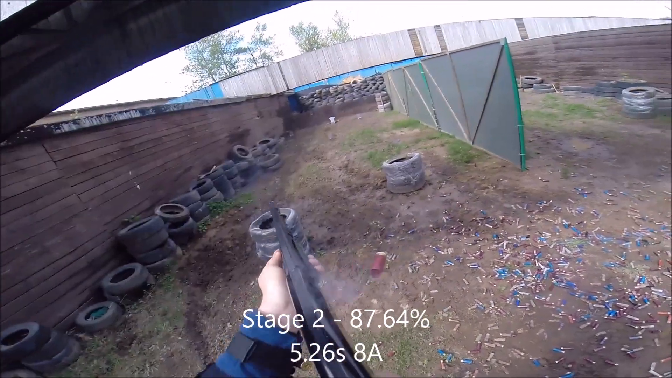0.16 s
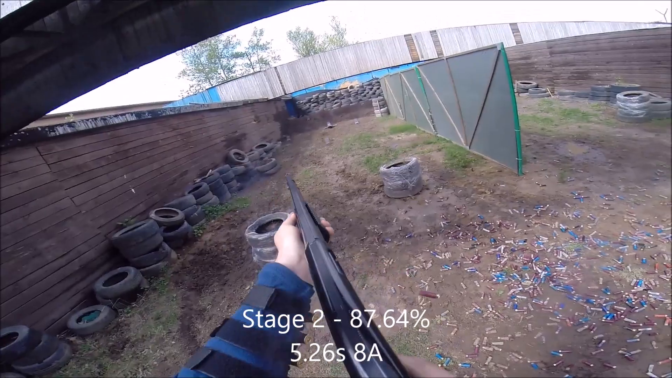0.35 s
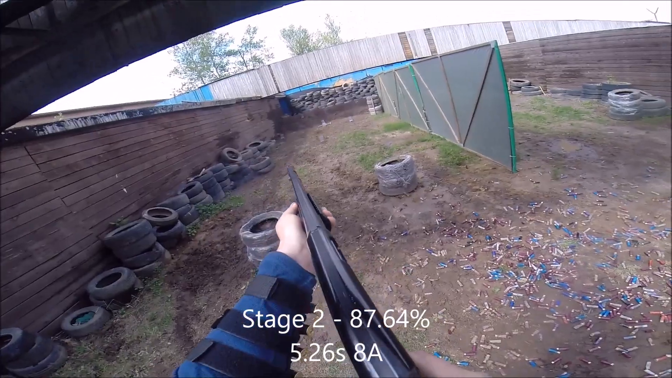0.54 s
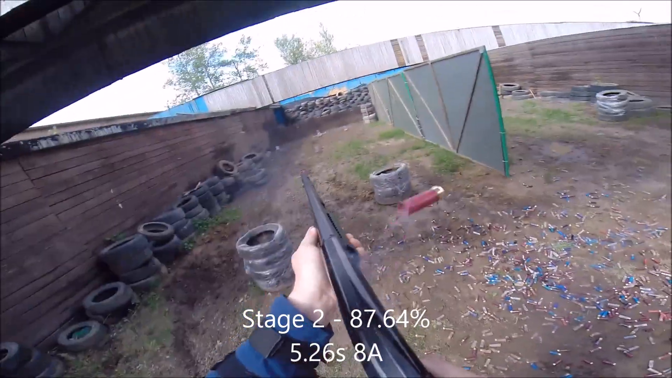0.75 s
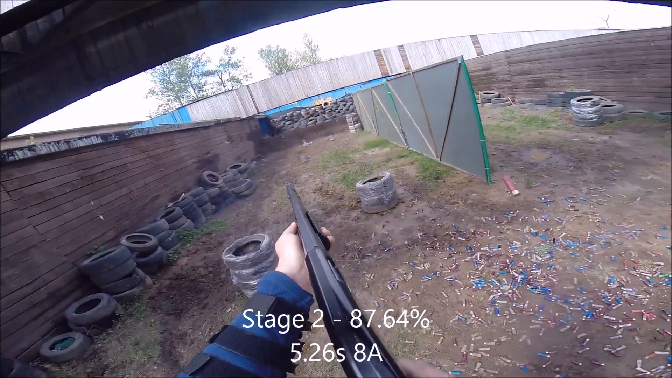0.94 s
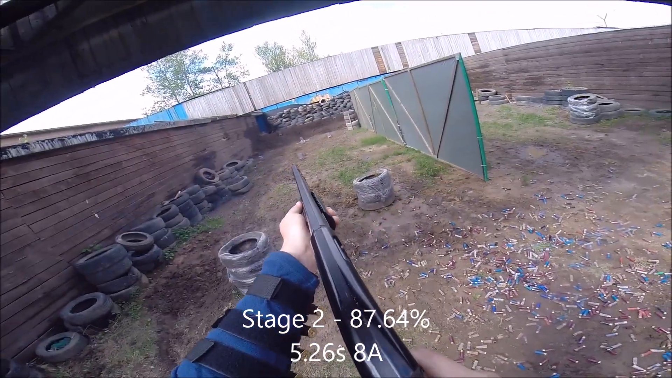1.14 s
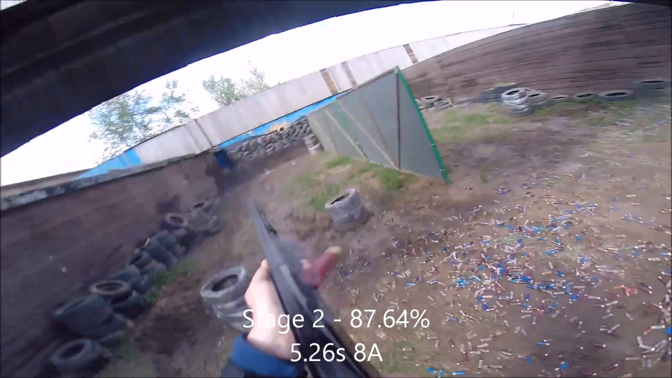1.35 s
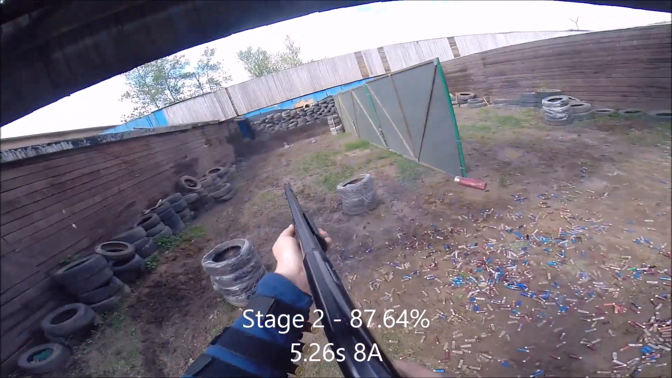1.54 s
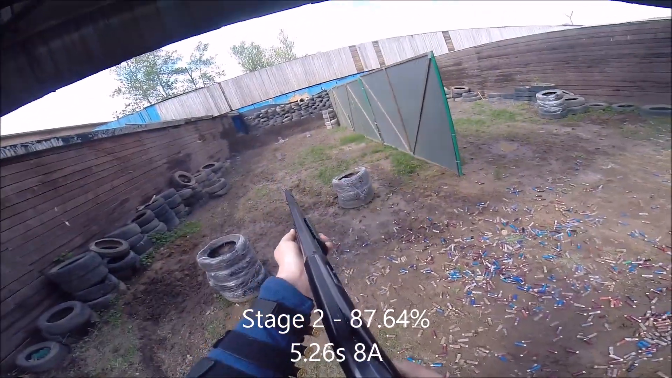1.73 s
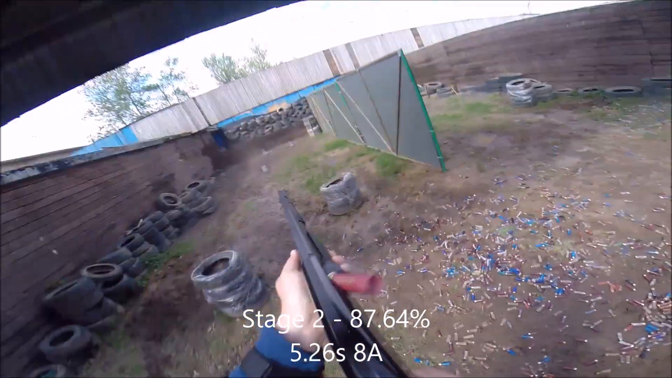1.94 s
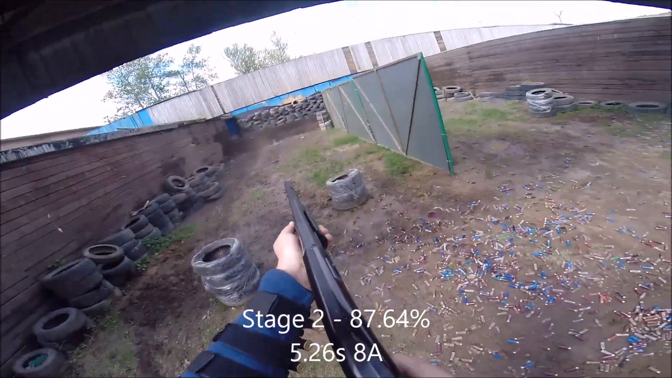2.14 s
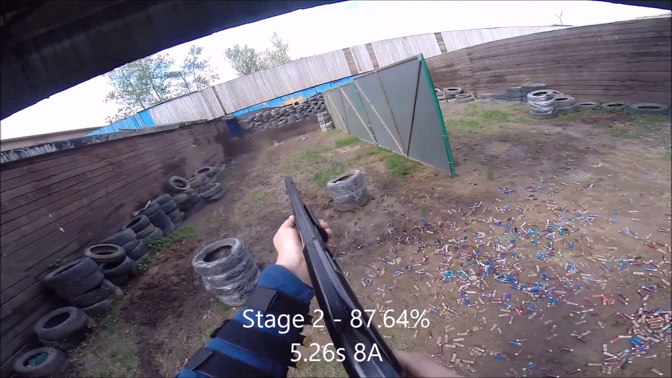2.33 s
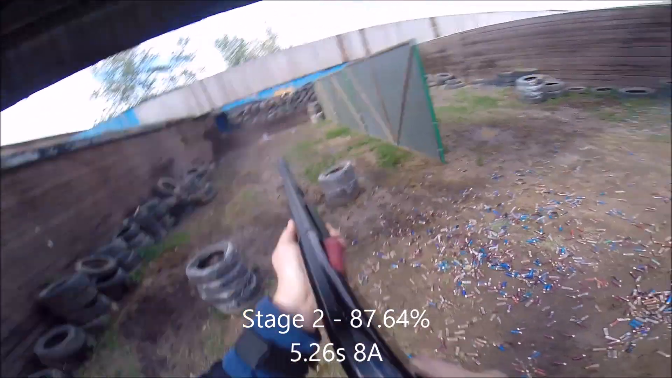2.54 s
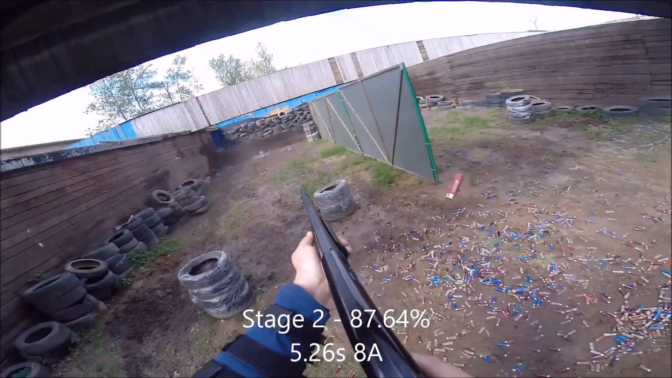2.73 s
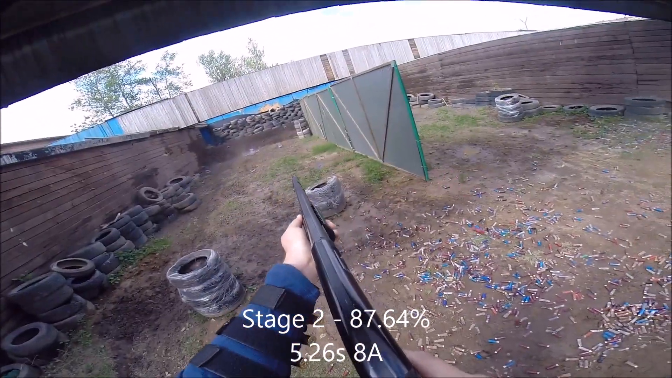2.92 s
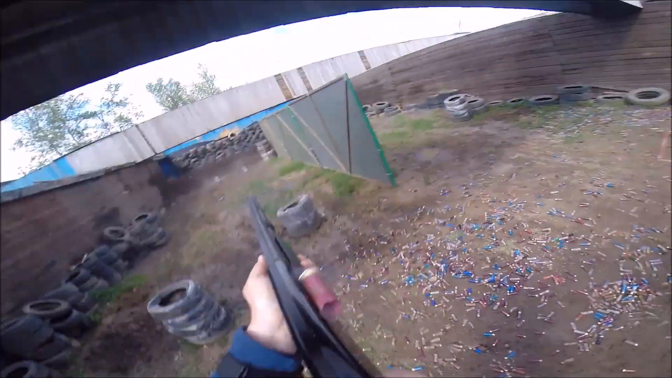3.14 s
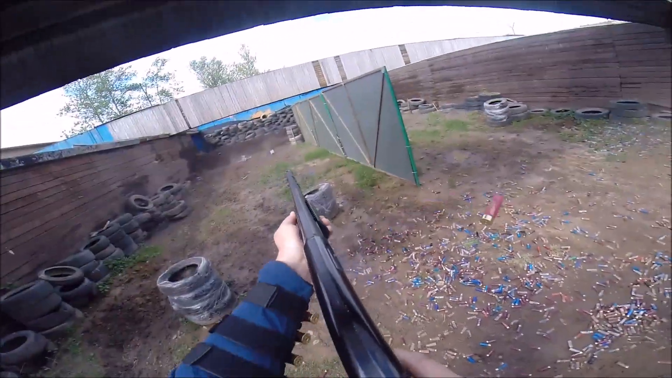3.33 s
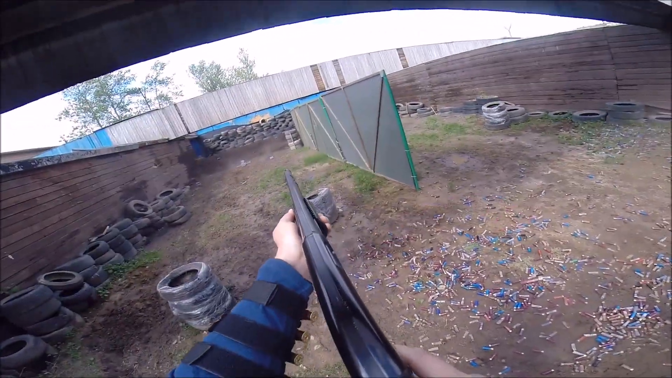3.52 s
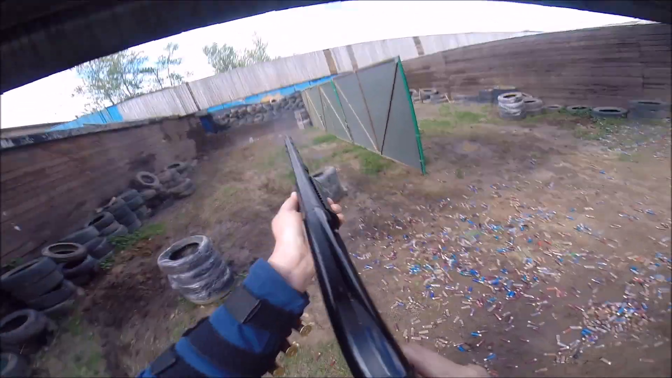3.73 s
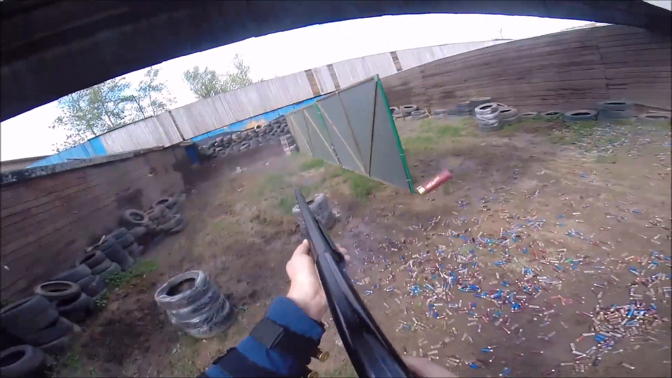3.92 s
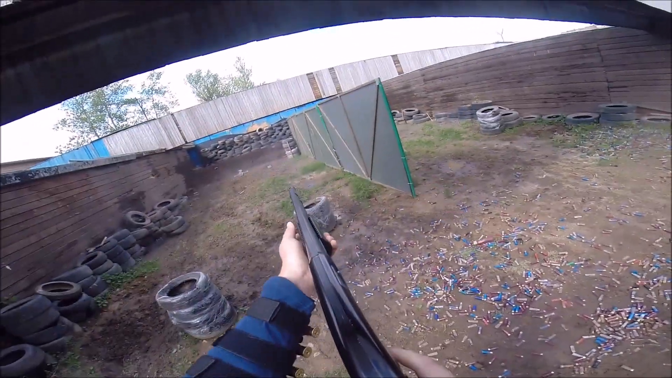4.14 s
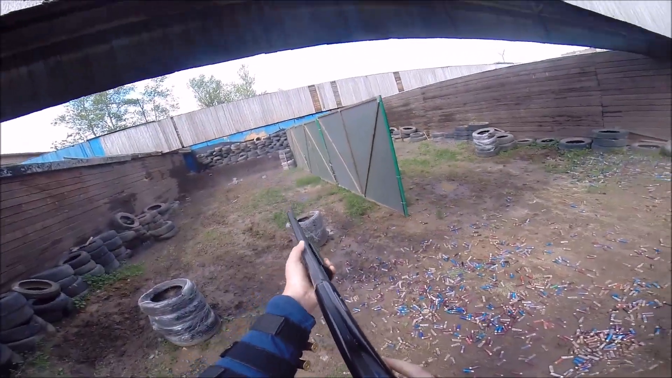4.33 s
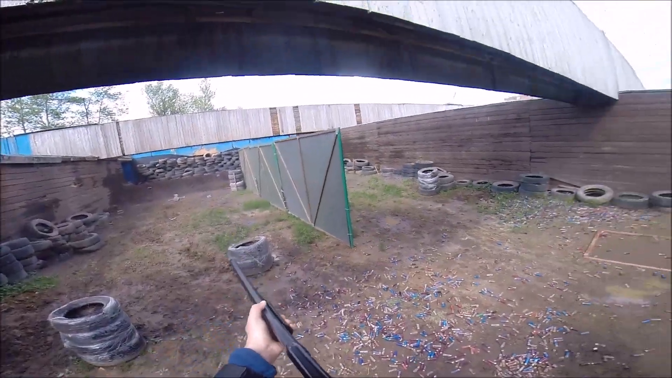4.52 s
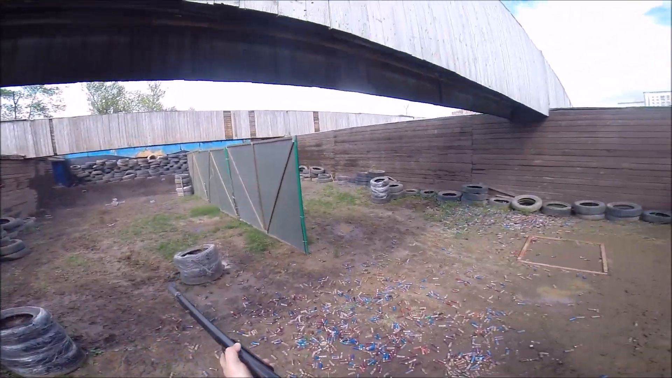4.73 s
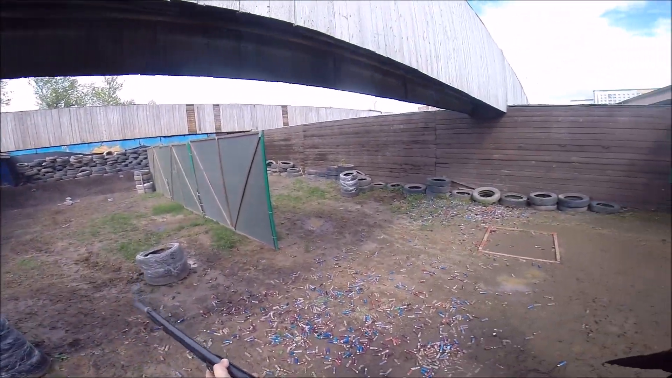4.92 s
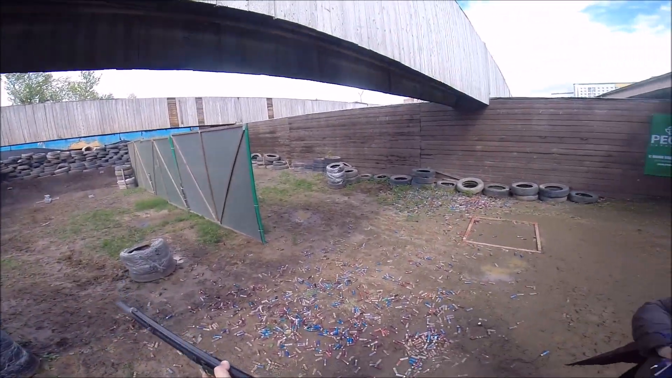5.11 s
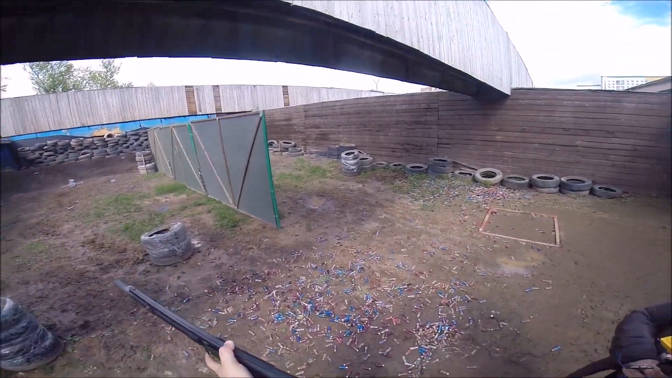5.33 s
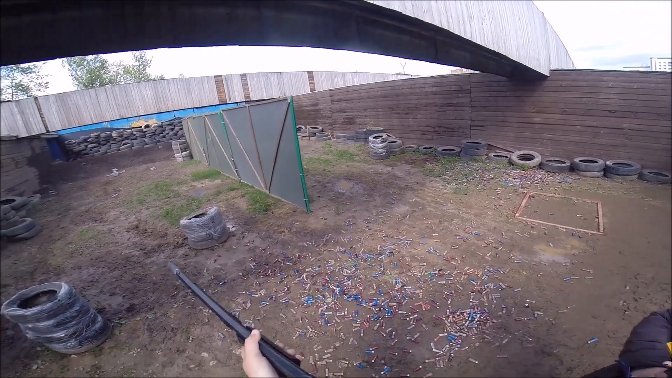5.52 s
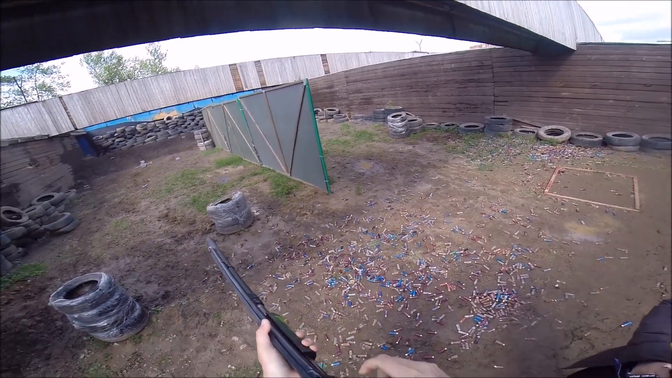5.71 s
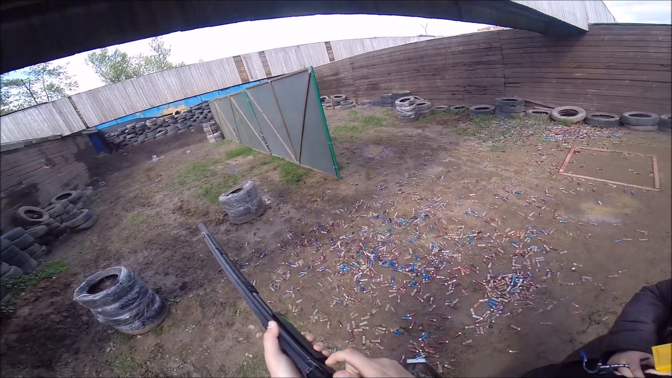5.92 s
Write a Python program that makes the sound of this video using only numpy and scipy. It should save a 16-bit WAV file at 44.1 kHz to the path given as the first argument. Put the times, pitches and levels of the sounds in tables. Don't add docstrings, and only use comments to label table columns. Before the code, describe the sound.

A pump shotgun is fired seven times in a walled outdoor bay, heard through a cased microphone on the shooter's head. Blasts come at about 0.03, 0.68, 1.34, 1.94, 2.56, 3.14 and 3.78 seconds, each a hard, clipped, midrange-heavy crack with a low thump. A dry pellet smack on steel follows within 0.1 seconds, then dense wall echo, holding about 0.2 seconds before dying quickly, with low booming returns. Between shots the slide clacks back, a shell lifts and the bolt snaps shut, with small rattles and body knocks. The last bolt shuts near 4.1. From 4.3 to 4.75 faint outdoor air, hiss and thin insect sounds rise. A sharp handling click with a springy low wobble lands at 4.54; dull scuffs run from 4.85 to 5.44 over wind rumble, a click at 5.48, and a clattering cluster peaks at 6.06.

```python
import sys
import numpy as np
from scipy import signal
from scipy.io import wavfile

SR = 44100
rng = np.random.default_rng(int(sys.argv[2]) if len(sys.argv) > 2 else 0)


def to_linear_factor(level_db):
    exponent = np.asarray(level_db, float) / 20
    return 10 ** exponent


def materialize(psi):
    bounded = np.clip(np.atleast_2d(psi).T, -1, 1)
    quanta = np.round(bounded * 32767).astype(np.int16)
    wavfile.write(sys.argv[1], SR, quanta)


N = 267406

# centre in Hz, width in Hz, level in dB.
CASE = [(1650, 310, 2), (2900, 140, 11.5), (4400, 270, -2.5), (5460, 110, 3.5), (9500, 1000, -28.5)]

# time in seconds, level in dB.
WIND = [
    (0, -48),
    (1.2, -51.5),
    (2.4, -55),
    (3.6, -52.5),
    (4.3, -51.5),
    (4.6, -44.5),
    (5.1, -43),
    (5.55, -46.5),
    (5.75, -39.5),
    (6.06, -43),
]
WIND_UPPER_DB, WIND_DUCK_DB = -21.5, -15
SHAKE_S, SHAKE_DB, SHAKE_DEEP_DB = 0.17, -22, 11.5
SHAKE_RISE_DB_PER_S, SHAKE_FALL_DB_PER_S = 89, 126.5

# frequency in Hz, density in dB per Hz.
AIR_COLOUR = [(71, -29), (120, -5.5), (418, -7.5), (1050, -12.5), (1620, -12.5), (3110, -12), (3980, -18),
              (5520, -18), (12500, -37), (14700, -49), (16000, -55)]
AIR_DB, HISS_DB = -60, -72.5
RECOVER_S, RECOVER_TAKES_S = 4.27, 0.48
DUCK_DB, LOW_AIR_DUCK_DB, HISS_DUCK_DB = -12, -5, -19
EARLIER_DB, EARLIER_S = 22, .03
# start in seconds, end in seconds.
DROPOUTS = [
    (5.358, 5.39),
    (5.632, 5.642),
    (5.675, 5.69),
]
INSECT_HZ, INSECT_PER_S, INSECT_DB = 10700, 45, -84

# start in seconds, wall echo in dB, low push in dB, chest thump in dB, wall boom in dB.
SHOTS = [
    (0.0309, -0.5, -32.5, -20.5, -28),
    (0.6788, 1, -35, -12.5, -24),
    (1.342, 1, -22.5, -14, -22),
    (1.9375, 0.5, -27.5, -23.5, -20),
    (2.5638, 1, -35.5, -17.5, -22.5),
    (3.1386, 0, -26, -36, -22),
    (3.7821, 0, -13.5, -25, -23.5),
]
# centre in Hz, width in Hz, level in dB.
MUZZLE = [(310, 82, -17.5), (700, 100, -19), (1138, 140, -12), (1700, 1000, -1), (2300, 860, 1),
          (3100, 430, 0), (4530, 640, -8.5), (5720, 370, -8), (8500, 1000, -37)]
# seconds after the shot, level in dB relative to the blast.
SLAPS = [
    (.0082, -9.5),
    (0.0114, -17.5),
    (0.022, -20),
]

# frequency in Hz, density in dB per Hz.
ECHO_COLOUR = [(88, -40), (150, -11), (275, -10), (494, -8.5), (759, -7.5), (1450, -5), (1600, 3.5),
               (2020, -3.5), (2760, 1), (4160, -10), (6260, -13), (8070, -29.5), (12900, -35), (15100, -42),
               (16000, -74.5)]
NEAR_DB, NEAR_DB_PER_S = -24, 198.5
HOLD_DB, HOLD_S, DYING_DB_PER_S = -31, 0.19, 86
FAR_DB, FAR_DB_PER_S = -40.5, 26
BASS_DB, BASS_DB_PER_S, TREBLE_DB, TREBLE_DB_PER_S, TILT_END_DB = 0.5, 30.5, 9.5, 48, -9.5
# seconds after the shot, level change in dB.
GAPS = [
    (0.035, -1.5),
    (.055, -2),
    (.1, -3.5),
    (.193, 0),
    (.21, 1),
    (.125, 2),
]
GAP_WIDTH_S = .007
SCRAPE_S, SCRAPE_WIDTH_S, SCRAPE_DB = 0.299, 0.017, 9
BOOM_FIRST_S, BOOM_TRIP_S, BOOM_LOSS_DB, BOOM_HZ, BOOM_DULLING = .064, 0.09, 4, 24, 0.82

# start in seconds, peak in dB, centre in Hz, T60 in seconds.
PLATES = [
    (0.0657, 1, 3420, 0.0089),
    (0.7436, -6.5, 3100, 0.0087),
    (1.4268, -6, 2930, 0.016),
    (1.9812, -5, 3540, 0.0069),
    (2.6385, -7, 3230, 0.0048),
    (3.1995, -4.5, 3420, 0.011),
    (3.8676, -10, 5440, 0.0082),
]
# start in seconds, peak in dB, centre in Hz,
# T60 in seconds.
RATTLES = [(.571, -39.5, 2800, 0.44), (.585, -37, 2220, 0.24), (.598, -35.5, 2900, 0.065),
           (.625, -44.5, 2760, 0.24), (1.333, -48, 3960, .03), (1.278, -43.5, 3500, 0.27),
           (1.319, -35.5, 3530, 0.044), (1.911, -40.5, 4100, 0.055), (2.342, -44, 7000, .015),
           (2.461, -40.5, 6000, 0.041), (2.540, -39, 4960, 0.026), (3.106, -39.5, 4100, .03),
           (3.537, -45, 5000, .03), (3.602, -40, 4800, 0.033), (3.741, -31.5, 3170, 0.064),
           (3.762, -41, 5470, 0.037), (4.428, -51, 6370, .015)]

UNLOCK_S, UNLOCK_DB, UNLOCK_HZ = .065, -19, 6000
BACK_HZ, LIFT_HZ, SHUT_HZ, ACTION_T60_S = 5220, 4350, 4500, .015
# start in seconds, peak in dB.
SLIDE_BACK = [
    (0.141, -35),
    (0.7915, -17),
    (1.4444, -15),
    (2.051, -23),
    (2.6775, -19.5),
    (3.2515, -22.5),
    (3.8914, -21.5),
]
# start in seconds, peak in dB.
SHELL_LIFT = [
    (0.3182, -30),
    (0.9552, -27),
    (1.605, -24),
    (2.1992, -24),
    (2.85, -27),
    (3.4082, -28),
    (4.069, -29),
]
# start in seconds, peak in dB.
BOLT_SHUT = [
    (0.3486, -19.5),
    (0.9956, -27.5),
    (1.638, -23.5),
    (2.2325, -19.5),
    (2.8938, -28.5),
    (3.4423, -26),
    (4.1064, -22.5),
]
# start in seconds, peak in dB, centre in Hz.
LOOSE = [(0.121, -32.5, 5950), (0.275, -38, 4500), (0.3332, -31, 5320), (0.881, -29, 6170),
         (1.357, -15, 4480), (1.363, -16.5, 6100), (2.1171, -33, 6200), (2.155, -23, 4150),
         (2.6504, -33, 4800), (3.273, -29, 6050), (3.824, -26, 4500), (3.96, -34, 5940), (3.985, -34, 6200)]

KICK_S, KICK_DB, KICK_HZ = 0.084, -39, 107
# start in seconds, peak in dB, pitch in Hz.
KNOCKS = [(1.422, -32.5, 296), (2.014, -35.5, 263), (2.096, -36.5, 238), (2.147, -38, 272),
          (2.283, -52, 225), (2.31, -44, 263), (2.64, -34.5, 229), (2.735, -43, 300), (3.259, -38, 223),
          (3.3, -35.5, 265), (3.852, -38, 248), (3.941, -32, 262), (3.988, -35.5, 271), (4.125, -49, 278)]
# start in seconds, peak in dB, pitch in Hz.
JOLTS = [
    (1.5, -39, 49.5),
    (2.11, -28, 45),
    (2.3, -36.5, 59.6),
    (3.3, -30, 57.4),
    (3.9, -24.5, 70.3),
    (3.96, -19.5, 40),
    (5.71, -30.5, 47.6),
]
# start in seconds, peak in dB, pitch in Hz, T60 in seconds.
RINGS = [(2.668, -32, 5520, .4), (2.66, -36, 5900, .25), (2.65, -36, 4650, .2), (2.642, -30, 6150, .15),
         (2.645, -30, 5050, .12), (2.648, -34, 4300, .1), (2.6, -35, 5400, .12), (4.543, -53, 1179, .07),
         (4.542, -39, 4500, .08), (4.555, -42, 5700, .07), (5.28, -45, 1600, .15)]
# start in seconds, peak in dB.
WOBBLES = [
    (4.511, -24.5),
    (4.559, -25),
    (4.627, -25.5),
]

# start in seconds, peak in dB, centre in Hz, T60 in seconds.
HANDLING = [(4.5395, -13, 4780, 0.009), (4.557, -40, 6000, .06), (4.545, -42, 4500, .07),
            (4.575, -42, 4300, 0.08), (4.605, -45, 5500, 0.043), (4.666, -41, 4800, 0.014),
            (4.70, -46, 5180, 0.013), (5.477, -21.5, 2900, 0.03), (5.478, -30.5, 5510, 0.031),
            (5.4775, -37, 1490, 0.06), (5.479, -33.5, 9190, 0.014), (5.516, -39.5, 4600, 0.026),
            (5.981, -34, 3500, 0.014), (5.991, -33, 3000, 0.042), (5.997, -28.5, 6000, 0.007),
            (6.001, -29, 2300, 0.029), (6.023, -39, 3300, 0.045), (6.034, -28, 2530, 0.066),
            (6.0405, -24, 5100, 0.032), (6.047, -20, 2900, 0.1), (6.051, -19.5, 9100, 0.014),
            (6.0565, -8.5, 4500, 0.023), (6.057, -12, 2300, 0.05), (6.049, -26.5, 930, 0.13)]
# start in seconds, peak in dB, centre in Hz, T60 in seconds.
SCUFFS = [(4.8522, -40.5, 2890, 0.12), (4.878, -40.5, 1722, 0.088), (5.0012, -45, 1765, 0.089),
          (5.1382, -37.5, 1700, 0.076), (5.1624, -41, 1640, 0.11), (5.2031, -47.5, 1980, 0.08),
          (5.2789, -30.5, 1550, 0.074), (5.3014, -35.5, 1583, 0.12), (5.3436, -41, 1593, 0.13),
          (5.3794, -48, 1510, 0.087), (5.416, -45, 1580, 0.14), (5.4384, -52, 1470, 0.22)]
CHIRP_FIRST_S, CHIRP_EVERY_S, CHIRP_S, CHIRP_DB = 4.665, .145, .016, -71

CUTOFF_HZ = 16600


def unit(x):
    return x / np.sqrt(np.mean(x ** 2) + 1e-20)


def band(x, low_hz, high_hz):
    sos = signal.butter(2, [low_hz, min(high_hz, .45 * SR)], "band", fs=SR, output="sos")
    return signal.sosfilt(sos, x)


def resonance(x, hz, width_hz):
    r = np.exp(-np.pi * width_hz / SR)
    poles = [1, -2 * r * np.cos(2 * np.pi * hz / SR), r * r]
    return signal.lfilter(np.array([1, 0, -1]) * (1 - r * r) / 2, poles, x)


def through_case(x, modes=CASE, window=1):
    out = 0
    for k, (hz, width_hz, db) in enumerate(modes):
        out = out + to_linear_factor(db) * (-1) ** k * unit(window * resonance(x, hz, width_hz))
    return out


def drift(rate_hz, size):
    r = np.exp(-2 * np.pi * rate_hz / SR)
    slow = signal.lfilter([1], [1, -2 * r, r * r], rng.standard_normal(size + SR // 4))
    return unit(slow[SR // 4:])


def add(out, s, piece):
    i = round(s * SR)
    out[i:i + len(piece)] += piece[:N - i]


def bank(white, spectrum, count):
    edges = 125 * 2 ** np.arange(0, 7.1, 1 / count)
    hz, db = np.transpose(spectrum)
    centres = np.sqrt(edges[:-1] * edges[1:])
    gains = to_linear_factor(np.interp(np.log(centres), np.log(hz), db))
    bands = np.array([g * band(white[k % 2], edges[k], edges[k + 1]) for k, g in enumerate(gains)])
    return centres, bands / np.sqrt(np.mean(bands.sum(0) ** 2))


def ducked():
    return np.clip(1 - (np.arange(N) / SR - RECOVER_S) / RECOVER_TAKES_S, 0, 1)


def rumble():
    t, white = np.arange(N) / SR, rng.standard_normal((2, N))
    wind = to_linear_factor(np.interp(t, *np.transpose(WIND)))
    shots = np.array(SHOTS)
    late = t - SHAKE_S - shots[:, :1]
    away_db = np.maximum(SHAKE_FALL_DB_PER_S * late, -SHAKE_RISE_DB_PER_S * late)
    shake = to_linear_factor(SHAKE_DB + shots[:, 4:] - away_db).sum(0)
    deep = (wind + to_linear_factor(SHAKE_DEEP_DB) * shake) * unit(band(white[0], 8.7, 33))
    upper_level = to_linear_factor(WIND_UPPER_DB + WIND_DUCK_DB * ducked()) * wind + shake
    upper = upper_level * to_linear_factor(1.3 * drift(15, size=N)) * unit(band(white[1], 35, 210))
    return deep + upper


def air():
    t, down = np.arange(N) / SR, ducked()
    centres, bands = bank(rng.standard_normal((2, N)), AIR_COLOUR, count=4)
    hiss_level = to_linear_factor(HISS_DB + HISS_DUCK_DB * down + 0.96 * drift(8, size=N))
    hiss = hiss_level * unit(band(rng.standard_normal(N), 8100, 18000))
    pulse = 1 + np.sin(2 * np.pi * INSECT_PER_S * t)
    insect = to_linear_factor(INSECT_DB) * pulse * np.sin(2 * np.pi * INSECT_HZ * t) * (1 - down)
    kept = 1 - .97 * sum((t > a) & (t < b) for a, b in DROPOUTS)
    earlier_db = EARLIER_DB * np.maximum(1 - t / EARLIER_S, 0)
    level = to_linear_factor(AIR_DB + 2.5 + DUCK_DB * down + earlier_db + 1.4 * drift(4.9, size=N))
    low = to_linear_factor(LOW_AIR_DUCK_DB * down) * bands[centres < 1000].sum(0)
    middle = bands[(centres >= 1000) & (centres < 3800)].sum(0)
    top = kept * bands[centres >= 3800].sum(0)
    return level * (low + middle + top) + kept * (hiss + insect)


def blast(push_db, thump_db):
    t = np.arange(SR // 5) / SR
    late = np.maximum(t - .0045, 0)
    tick_fade = np.minimum(t / .002, 1) * np.exp(-t / 0.0083)
    tick = to_linear_factor(-18) * unit(band(rng.standard_normal(len(t)), 2900, 9000)) * tick_fade
    rise = np.minimum(late / .001, 1)
    burning = rise / (1 + np.exp(np.minimum((late - .0047) / .0006, 50)))
    gas = to_linear_factor(-17.0) * through_case(rng.standard_normal(len(t)), MUZZLE, window=burning)
    thump = -to_linear_factor(thump_db + 14.5) * rise * np.exp(-late / 0.00092) * np.sin(2 * np.pi * 420 * late)
    swell = late / 0.0015 * np.exp(1 - late / 0.0033)
    push = -to_linear_factor(push_db + 13.0) * swell * (1 - late / 0.0047) * np.exp(-late / 0.0057)
    out = tick + gas + thump + push
    short = (gas + thump) * np.exp(-late / 0.0014)
    for s, db in SLAPS:
        out += to_linear_factor(db) * np.roll(short, round(s * SR))
    return out


def bay_level(t):
    near = NEAR_DB - NEAR_DB_PER_S * t
    held = HOLD_DB - DYING_DB_PER_S * np.maximum(t - HOLD_S, 0)
    far = FAR_DB - FAR_DB_PER_S * t
    gaps_db = sum(db * np.exp(-((t - s) / GAP_WIDTH_S) ** 2) for s, db in GAPS)
    mid_db = 10 * np.log10((to_linear_factor(np.array([near, held, far])) ** 2).sum(0)) + gaps_db
    scrape_db = SCRAPE_DB * np.exp(-((t - SCRAPE_S) / SCRAPE_WIDTH_S) ** 2)
    bass_db = np.maximum(BASS_DB - BASS_DB_PER_S * t, TILT_END_DB)
    treble_db = np.maximum(TREBLE_DB - TREBLE_DB_PER_S * t, TILT_END_DB) + scrape_db
    return mid_db, bass_db, treble_db


def echo():
    out, t = np.zeros(N), np.arange(round(1.05 * SR)) / SR
    mid_db, bass_db, treble_db = bay_level(t)
    walls = to_linear_factor(1.4 * drift(64, size=len(t))) * (t > .006)
    centres, bands = bank(rng.standard_normal((2, 2 * SR)), ECHO_COLOUR, count=6)
    octave = np.log2(centres / 2000)[:, None]
    bass_tilt = np.clip(-octave / 3.9, 0, 1) * bass_db
    treble_tilt = np.clip(octave / 2.8, 0, 1) * treble_db
    shape = to_linear_factor(mid_db + bass_tilt + treble_tilt)
    for k, (s, db, *body) in enumerate(SHOTS):
        fresh = bands[:, 5000 * k:5000 * k + len(t)]
        grain = to_linear_factor(1.0 * drift(120, size=len(t)))
        clumps = [drift(35, size=len(t)) for _ in range(7)]
        patches = to_linear_factor(0.77 * np.repeat(clumps, 6, axis=0))
        add(out, s, to_linear_factor(db + 2.0) * walls * grain * (shape * patches * fresh).sum(0))
    return out


def boom():
    out, t = np.zeros(N), np.arange(round(.6 * SR)) / SR
    train = 0
    for k in np.arange(6):
        x = (t - BOOM_FIRST_S - k * BOOM_TRIP_S) * BOOM_HZ * BOOM_DULLING ** k
        hump = np.exp(-(x / 0.34) ** 2) * np.cos(2 * np.pi * x + .3)
        train = train + to_linear_factor(-BOOM_LOSS_DB * max(k - 1, 0)) * hump
    for s, *body, boom_db in SHOTS:
        add(out, s, to_linear_factor(boom_db) * train)
    return out


def hits(rows, spread, case_db, after_db, crack_db):
    out, t = np.zeros(N), np.arange(SR // 6) / SR
    for s, db, hz, t60 in rows:
        dying = to_linear_factor(-60 * t / max(t60, .004)) + to_linear_factor(after_db - 60 * t / 0.2)
        burst = rng.standard_normal(len(t)) * dying
        own = unit(resonance(resonance(burst, hz, spread * hz), hz, 2 * spread * hz))
        case = to_linear_factor(case_db) * unit(through_case(burst))
        crack = to_linear_factor(crack_db) * unit(band(burst, 4500, 21000))
        body = own + case + crack
        add(out, s, to_linear_factor(db) * body / np.abs(body).max())
    return out


def action():
    rows = [(s + UNLOCK_S, UNLOCK_DB, UNLOCK_HZ) for s, *rest in SHOTS]
    for table, hz in ((SLIDE_BACK, BACK_HZ), (SHELL_LIFT, LIFT_HZ), (BOLT_SHUT, SHUT_HZ)):
        rows += [(s, db, hz) for s, db in table]
    return [(*row, ACTION_T60_S) for row in rows + LOOSE]


def thuds(rows, cycles):
    out, t = np.zeros(N), np.arange(SR // 4) / SR
    for s, db, hz in rows:
        x = t * hz / cycles
        add(out, s, to_linear_factor(db) * x * np.exp(1 - x) * np.sin(2 * np.pi * hz * t))
    return out


def rings():
    out, t = np.zeros(N), np.arange(SR // 3) / SR
    for s, db, hz, t60 in RINGS:
        level = to_linear_factor(db - 60 * t / t60 + 5.1 * drift(25, size=len(t)))
        add(out, s, level * np.minimum(t / 0.0014, 1) * np.sin(2 * np.pi * hz * t))
    return out


def wobbles():
    out, t = np.zeros(N), np.arange(SR // 8) / SR
    turns = 45 * t + 0.63 * (1 - np.exp(-t / 0.0045))
    for s, db in WOBBLES:
        add(out, s, to_linear_factor(db) * t / 0.016 * np.exp(1 - t / 0.01) * np.sin(2 * np.pi * turns))
    return out


def chirps():
    beat = (np.arange(N) / SR - CHIRP_FIRST_S) / CHIRP_EVERY_S
    off_s = (beat - np.round(beat)) * CHIRP_EVERY_S
    puffs = np.exp(-(off_s / CHIRP_S) ** 2) * (beat > -.5)
    return to_linear_factor(CHIRP_DB) * puffs * unit(band(rng.standard_normal(N), 10900, 14300))


def scene():
    out = rumble() + air()
    out *= np.interp(np.arange(N) / SR, [.012, .017, .022, .026], [1, .02, .02, 1])
    for s, db, push_db, thump_db, boom_db in SHOTS:
        add(out, s - .0042, blast(push_db, thump_db))
    out += echo() + boom()
    out += hits(PLATES, spread=0.27, case_db=-2, after_db=-17.5, crack_db=-20)
    out += hits(action(), spread=0.77, case_db=-2, after_db=-16.5, crack_db=-18.0)
    kicks = [(s + KICK_S, KICK_DB, KICK_HZ) for s, *rest in SHOTS]
    out += thuds(kicks, cycles=0.6) + thuds(KNOCKS, cycles=1.65) + thuds(JOLTS, cycles=0.7)
    out += hits(RATTLES, spread=0.43, case_db=-6.5, after_db=-22, crack_db=-24.5)
    out += rings() + wobbles() + chirps()
    out += hits(HANDLING, spread=0.41, case_db=-15.5, after_db=-23.5, crack_db=-10.5)
    out += hits(SCUFFS, spread=0.31, case_db=-9, after_db=-16, crack_db=-23.5)
    return out[None]


def roll_off(x):
    return signal.sosfilt(signal.butter(12, 16490, fs=SR, output="sos"), x)


def record(dry):
    clipped = dry / (1 + np.abs(dry / 1.02) ** 4) ** (1 / 4)
    dull = signal.sosfilt(signal.butter(2, 12000, fs=SR, output="sos"), clipped)
    cut = signal.sosfilt(signal.cheby2(12, 70, CUTOFF_HZ, fs=SR, output="sos"), dull)
    return roll_off(to_linear_factor(-2.35) * cut)


dry = scene()
out = record(dry)
materialize(out)
```